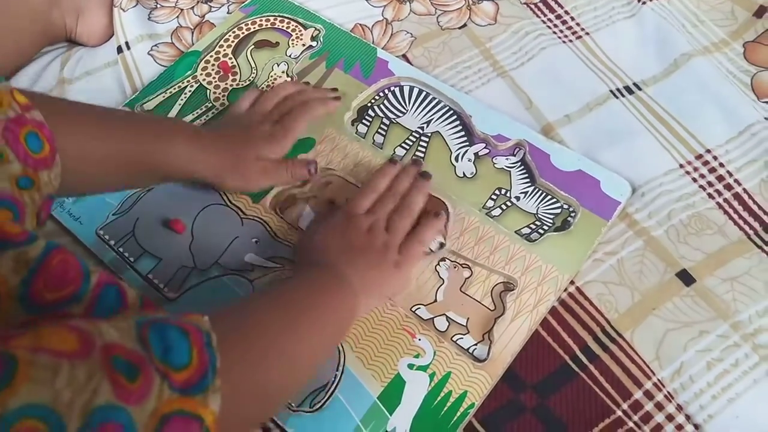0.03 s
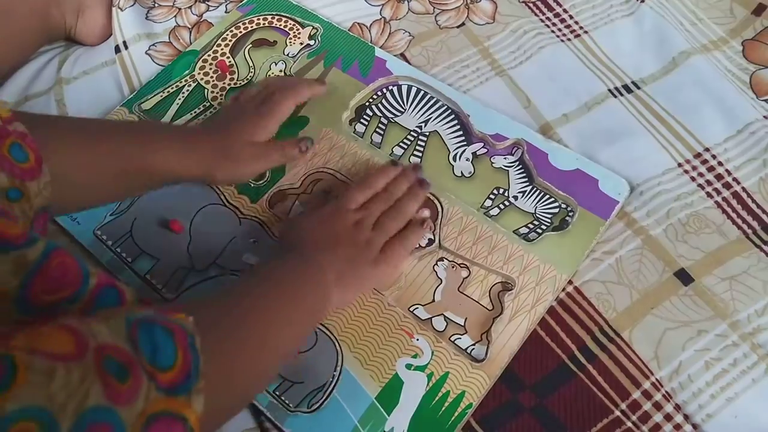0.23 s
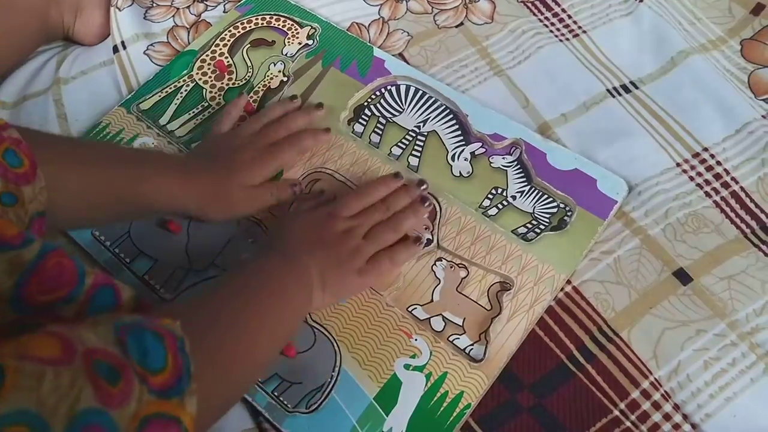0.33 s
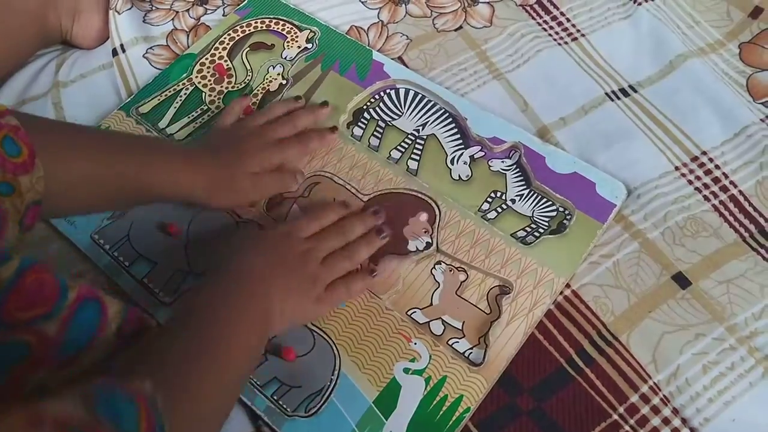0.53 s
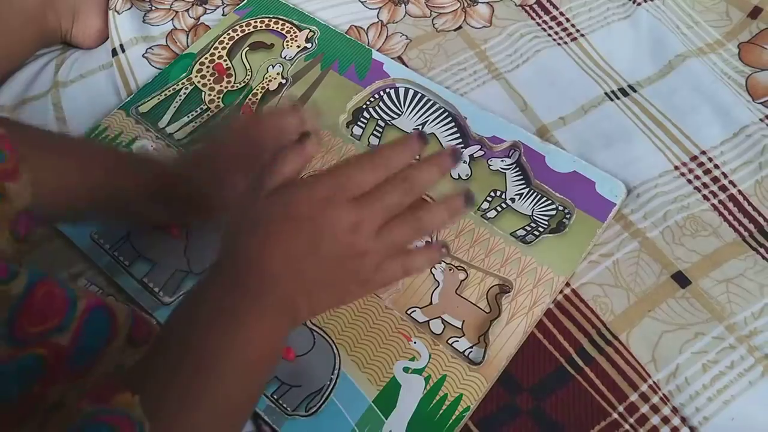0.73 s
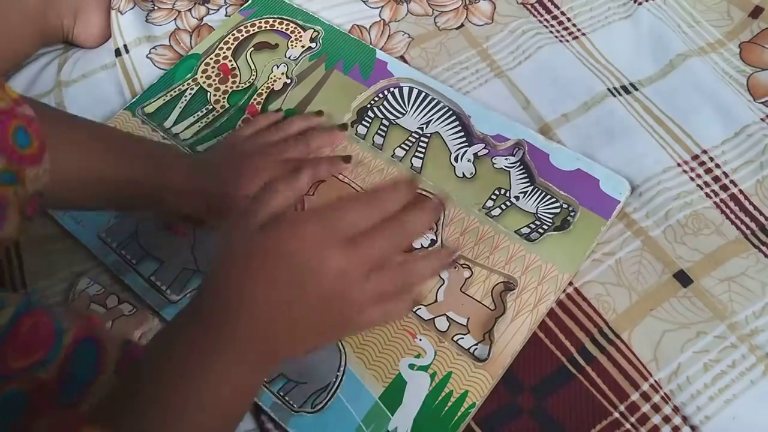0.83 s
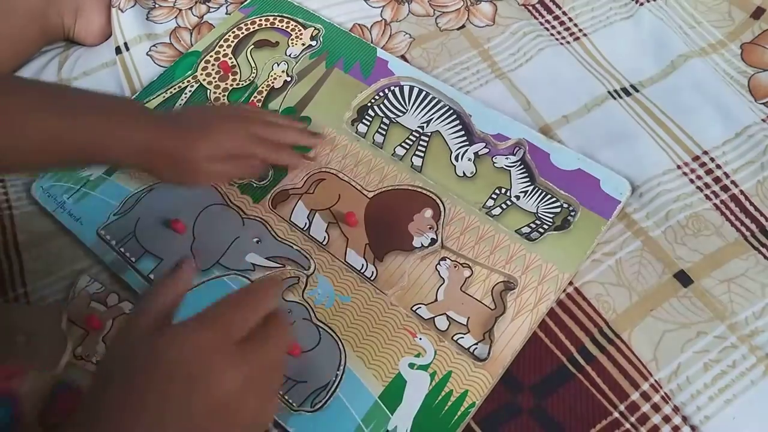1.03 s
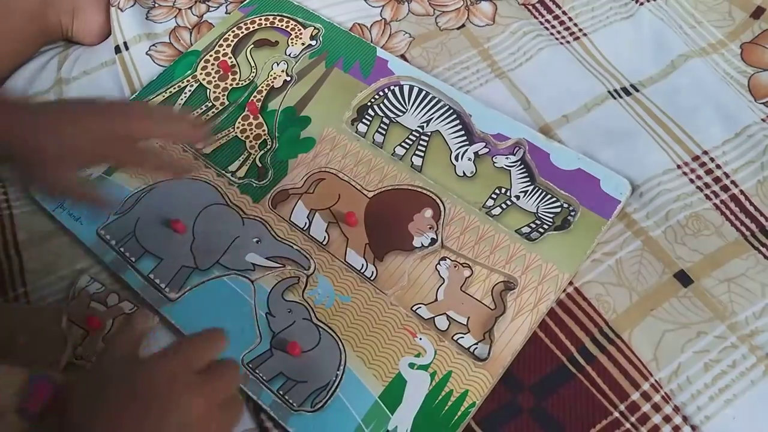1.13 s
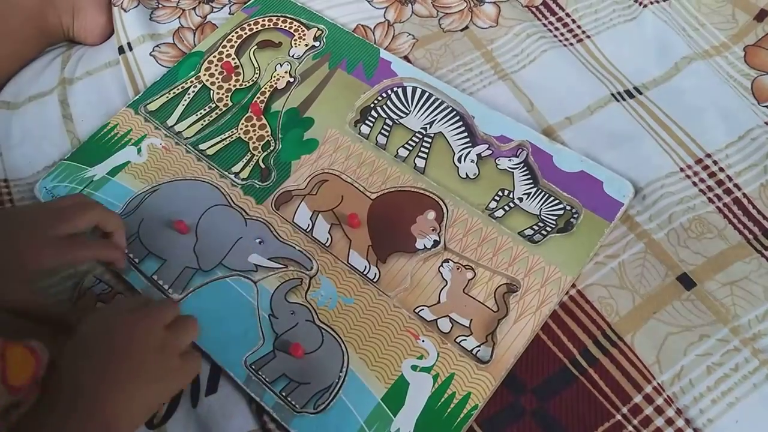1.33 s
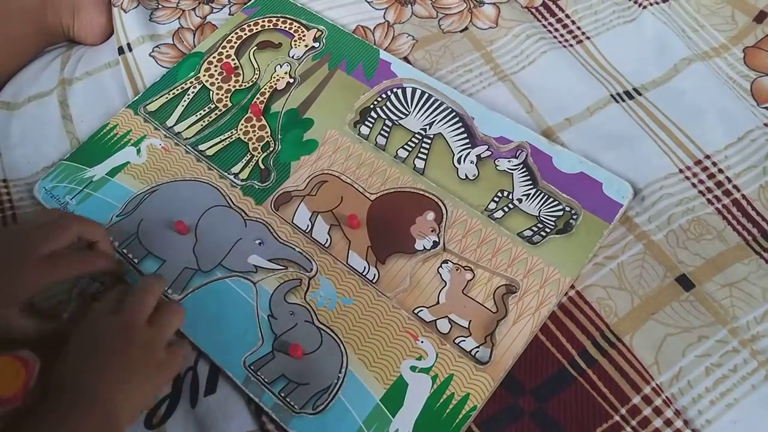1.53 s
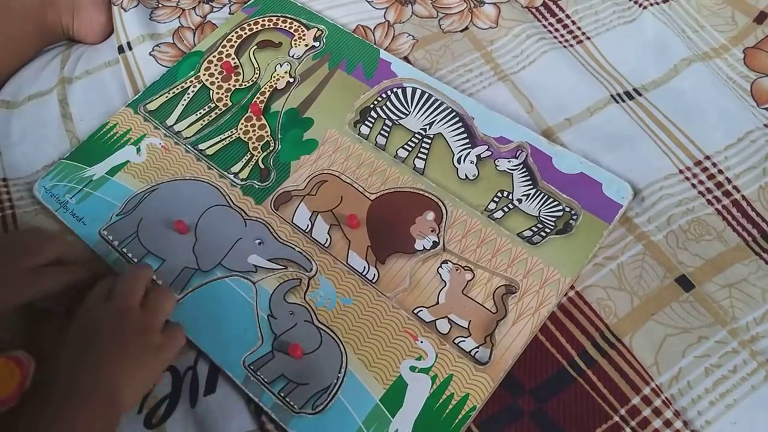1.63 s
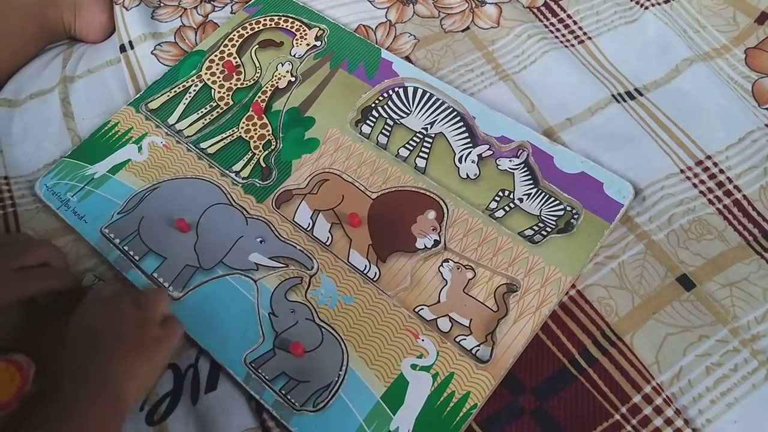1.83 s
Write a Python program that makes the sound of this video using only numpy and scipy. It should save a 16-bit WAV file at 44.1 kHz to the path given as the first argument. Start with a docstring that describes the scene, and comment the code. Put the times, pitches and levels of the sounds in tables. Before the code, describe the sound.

A wooden puzzle piece snaps into its board with a sharp clack at about 0.1 seconds. A faint fingertip squeak and a soft palm wipe follow around 0.4 to 0.6, then light taps near 0.8. At 1.3 the board is bumped with a duller knock, and a hollow scrape with small ticks runs until about 1.9. Everything is close, in a small room with low rumble and hum.

```python
"""A small, quiet room, with a wooden puzzle board lying on cloth close to a pair of microphones.
Pieces are pressed in: one snaps home, a fingertip squeaks over it and a palm wipes across. Then the
board is bumped and something slides along it with small taps and ticks. Each knock rings the board's
low, middle and high modes. The left microphone is slightly nearer and hears the board first.
Behind it all are a short room echo, low rumble, hum and faint hiss."""
import sys
import numpy as np
from scipy import signal
from scipy.fft import rfft, irfft
from scipy.io import wavfile
from scipy.ndimage import uniform_filter1d

SR = 44100
rng = np.random.default_rng(int(sys.argv[2]) if len(sys.argv) > 2 else 0)


def output_pcm(signal):
    """Save a mono or channel-first signal as 16-bit PCM at the path in sys.argv[1].

    Samples are clipped to [-1, 1] before scaling.
    """
    pcm = np.clip(np.atleast_2d(signal).T, -1, 1) * 32767
    wavfile.write(sys.argv[1], SR, np.round(pcm).astype(np.int16))


N = 83790
TIME = np.arange(N) / SR
# how much sooner each sound reaches the left microphone
BOARD_LEAD_S, CONTACT_LEAD_S, CATCH_LEAD_S, SLIDE_LEAD_S = .00009, .0001, .00028, .00048
BURST_T60_S = .013

# room rumble and hiss: frequency_hz, level_db
ROOM_TONE_SPECTRUM = [(20, -6.5), (40, 7.5), (70, 0.5), (108, 6.5), (160, -9), (260, -20.5), (500, -39.5),
                      (1200, -36.5), (3000, -37.5), (6000, -29.5), (8000, -37.5), (16000, -39)]
# skin and sleeves brushing: time_s, level_db
BRUSH_ENVELOPE = [(0, -62.5), (.09, -58.5), (.16, -68.5), (.29, -69), (.345, -61.5), (.41, -72.5),
                  (.55, -84), (.71, -87), (.81, -68.5), (.89, -74), (.98, -71.5), (1.06, -86.5),
                  (1.22, -82.5), (1.72, -70), (1.75, -61), (1.8, -73), (1.9, -84)]
# their rustle: frequency_hz, level_db
BRUSH_SPECTRUM = [(200, 13), (600, 6), (1400, -3.5), (3300, 4.5), (6300, 0), (7800, -22), (15000, -22.5)]
# knocks on the board: start_s, thud_db, wood_db, crack_db, crack_cutoff_hz, left_over_right_db
BOARD_KNOCKS = [(0.016, -53, -76, -58, 6740, 14), (0.0875, -63, -47, -45, 5050, -3),
                (0.1057, -85, -34, -29.5, 2460, 2.5), (0.1131, -35, -18.5, -9, 15100, -1.5),
                (0.1164, -42, -28.5, -24.5, 5000, 0.5), (0.7459, -47, -58, -50.5, 6000, -2.5),
                (0.7503, -46.5, -53.5, -54.5, 3000, 1.5), (0.7864, -52.5, -46, -37, 2450, -1.5),
                (0.960, -68, -69, -59, 4000, -1.5), (1.2874, -27.5, -36, -43, 2040, 1.5),
                (1.2903, -31, -34.5, -25, 14900, 6.5), (1.2988, -29.5, -29, -51, 2050, 0.5),
                (1.629, -47, -49, -38, 4000, 5), (1.74, -48, -48.5, -79.5, 5950, 12),
                (1.754, -40, -45, -66, 8600, 3), (1.859, -54, -61, -65, 4250, 5)]
# the board's low modes, its thud: pitch_hz, level_db, t60_s
LOW_MODES = [(55, -9.5, 0.37), (162.9, -7.5, 0.24), (235.6, -2.5, 0.088), (271, -10, 0.045),
             (390.8, -11, 0.053)]
# its middle modes, the woody note: pitch_hz, level_db, t60_s
MIDDLE_MODES = [(291, -8, 0.034), (468, -10, 0.039), (580, -1.5, 0.016), (753, -9, 0.023),
                (903, -17, 0.028), (990, -13, 0.027), (1350, -18.5, 0.005)]
# its high modes, the crack: pitch_hz, level_db, t60_s
HIGH_MODES = [(1490, -22, .015), (1722, -15.5, 0.01), (2090, -13.5, 0.0079), (2373, -17.5, 0.023),
              (2800, -24, 0.0092), (3525, -4.5, 0.01), (3575, -9, 0.015), (4010, -8.5, 0.0054),
              (5500, -2.5, 0.0064), (5640, -19, 0.0059), (6680, -12.5, .012), (7380, -16, 0.0051),
              (8500, -21, 0.004)]
# the splintery burst of a contact: frequency_hz, level_db
BURST_SPECTRUM = [(300, -10.5), (1200, -0.5), (3000, 7.5), (6500, 8.5), (8300, -4), (9500, -8), (12000, -8),
                  (16000, -17.5)]
# hands pressing the board into the cloth: start_s, level_db, t60_s
HAND_PRESSES = [(0.112, -45.5, 0.27), (0.743, -47, 0.78), (1.289, -54.5, 1), (1.734, -50.5, 1)]
# the rumble of a press: frequency_hz, level_db
PRESS_SPECTRUM = [(22, -7), (42, -4), (65, -2.5), (110, -13.5), (230, -20), (400, -37.5), (1000, -68)]
# board resonances under the fingertip: frequency_hz, level_db
SQUEAK_SPECTRUM = [(280, -9), (450, 5), (620, 0.5), (850, -6.5), (1200, -21.5), (2000, -36)]
# a palm wiping the pieces: time_s, level_db
WIPE_ENVELOPE = [(.40, -100), (.45, -75.5), (.56, -75.5), (.63, -83.5), (.68, -99)]
# its hiss: frequency_hz, level_db
WIPE_SPECTRUM = [(2000, -15.5), (4000, 6), (6500, 6.5), (9000, -1.5), (15000, -2.5)]
# sliding along the board: time_s, level_db
SLIDE_ENVELOPE = [(1.22, -100), (1.26, -76.5), (1.32, -47.5), (1.40, -56), (1.53, -59), (1.62, -56.5),
                  (1.74, -58), (1.81, -62), (1.9, -67)]
# its hollow scrape: frequency_hz, level_db
SLIDE_SPECTRUM = [(120, -1), (230, -7.5), (380, -11.5), (780, 1), (1300, -10.5), (2100, -13), (2530, 2),
                  (2900, -7), (3700, -12), (4300, -2.5), (4900, -6.5), (6300, -12), (7500, -20),
                  (9000, -24), (11500, -22.5), (15000, -26)]
# the slide catching: start_s, level_db
SLIDE_CATCHES = [(1.245, -56), (1.276, -45), (1.4215, -42), (1.604, -43), (1.653, -59.5), (1.7425, -42.5),
                 (1.7555, -43.5), (1.882, -57)]
# the ring of a catch: pitch_hz, level_db, t60_s
HOLLOW_MODES = [(600, -2.5, 0.0232), (739, 0.5, 0.0193), (1024, -11.5, 0.019), (2560, -9.5, 0.014),
                (4410, -24, 0.011), (5740, -10, 0.0059)]
# hard clicks at the edge of a piece: start_s, level_db, left_over_right_db
EDGE_TICKS = [(1.3268, -33, 9), (1.5763, -44.5, 15.5)]
# the ring of a tick: pitch_hz, level_db, t60_s
EDGE_MODES = [(2730, -20, 0.0071), (4120, 3.5, 0.011), (4504, -2, 0.025), (5830, -15, 0.0053),
              (6960, -1, 0.0063), (11900, -25, 0.0042), (13600, -22, .008)]
# the colour of the room's echo: frequency_hz, level_db
ECHO_SPECTRUM = [(60, -11.5), (250, -7.5), (600, -15.5), (1200, -8.5), (2500, -10.5), (6000, -13.5),
                 (8000, -15), (15000, -3)]
# the echo's decay: frequency_hz, t60_s
ECHO_DECAY = [(100, 0.41), (500, 0.48), (1500, 0.29), (5000, .3), (14000, 0.32)]


def from_db(db):
    return 10 ** (np.asarray(db) / 20)


def rms_one(x):
    return x / np.sqrt(np.mean(x ** 2) + 1e-20)


def at_hz(points, hz):
    frequencies, values = np.transpose(points)
    return np.interp(np.log(hz + 1e-3), np.log(frequencies), values)


def envelope(points):
    return from_db(np.interp(TIME, *np.transpose(points)))


def decay(t60_s):
    return from_db(-60 * np.minimum(TIME / t60_s, 10))


def butter(x, kind, hz, order=2):
    return signal.sosfilt(signal.butter(order, hz, kind, fs=SR, output="sos"), x)


def convolve(x, response):
    return signal.fftconvolve(np.broadcast_to(x, (2, N)), np.atleast_2d(response), axes=1)[:, :N]


def noise(spectrum):
    """Coloured noise, rms 1."""
    hz = np.arange(N // 2 + 1) * SR / N
    return rms_one(irfft(rfft(rng.standard_normal(N)) * from_db(at_hz(spectrum, hz)), N))


def at_mics(x, lead_s):
    """Sound reaches the right microphone a little after the left."""
    left, right = np.broadcast_to(x, (2, N))
    hz = np.arange(N // 2 + 1) * SR / N
    return np.array([left, irfft(rfft(right) * np.exp(-2j * np.pi * hz * lead_s), N)])


def stereo_noise(spectrum, lead_s, diffuse_db):
    """Noise at two microphones: a shared part and a diffuse part."""
    shared = at_mics(noise(spectrum), lead_s)
    diffuse = np.array([noise(spectrum), noise(spectrum)])
    return rms_one(shared + from_db(diffuse_db) * diffuse)


def grip(depth_db=2, samples=160):
    """Uneven grip: a gain that flickers at random."""
    flicker = rng.standard_normal(N)
    for _ in range(2):
        flicker = uniform_filter1d(flicker, samples, mode="wrap")
    return rms_one(from_db(depth_db * rms_one(flicker)))


def impulses(start_s, level_db, pan_db):
    """One stereo impulse for each contact; positive pan is to the left."""
    out = np.zeros((2, N))
    out[:, (start_s * SR).astype(int)] = from_db([level_db + pan_db / 2, level_db - pan_db / 2])
    return out


def ring(modes, alternate=False):
    """Decaying sines: in step they leave notches between them, with alternating signs they blend."""
    return sum(from_db(db) * decay(t60_s) * np.sin(2 * np.pi * hz * TIME) * (-1) ** (k * alternate)
               for k, (hz, db, t60_s) in enumerate(modes))


def room_tone(floor_db=-65.5, hum_hz=104.3, hum_db=-68, waver_db=2, waver_hz=7):
    """Low rumble and a wavering hum in the centre, faint hiss spread wide."""
    mid = noise(ROOM_TONE_SPECTRUM)
    side = butter(noise(ROOM_TONE_SPECTRUM), "high", hz=600, order=1)
    waver = rms_one(butter(rng.standard_normal(2 * N), "low", waver_hz)[N:])
    hum = from_db(hum_db + waver_db * waver) * np.sin(2 * np.pi * hum_hz * TIME)
    return from_db(floor_db) * (mid + side * [[1], [-1]]) + hum


def brushing():
    """Light, grainy friction of skin and sleeves."""
    return envelope(BRUSH_ENVELOPE) * grip() * stereo_noise(BRUSH_SPECTRUM, CONTACT_LEAD_S, diffuse_db=4)


def knocks(burst_db=-7):
    """Each contact rings three groups of modes with a brief burst; soft contacts lose the top."""
    start_s, thud_db, wood_db, crack_db, cutoff_hz, pan_db = np.transpose(BOARD_KNOCKS)
    # the board radiates little bass
    thud_ring = butter(ring(LOW_MODES), "high", hz=130)
    wood_ring = butter(ring(MIDDLE_MODES), "high", hz=230)
    thud = convolve(impulses(start_s, thud_db, pan_db=-2.5), thud_ring)
    wood = convolve(impulses(start_s, wood_db, pan_db), wood_ring)
    burst = from_db(burst_db) * decay(BURST_T60_S) * stereo_noise(BURST_SPECTRUM, 0, diffuse_db=4.5)
    hits = 0
    for k in range(len(start_s)):
        hit = impulses(start_s[[k]], crack_db[[k]], pan_db[[k]])
        hits = hits + butter(hit + 1e-18, "low", cutoff_hz[k])
    crack = convolve(hits, ring(HIGH_MODES, alternate=True) + burst)
    return at_mics(thud + wood, BOARD_LEAD_S) + at_mics(crack, CONTACT_LEAD_S)


def presses(rise_s=.006):
    """A soft rumble as the board settles into the cloth."""
    swell = 0
    for start_s, level_db, t60_s in HAND_PRESSES:
        age_s = TIME - start_s
        onset = np.clip(age_s / rise_s, 0, 1)
        swell = swell + from_db(level_db) * onset * np.interp(age_s, TIME, decay(t60_s))
    return swell * stereo_noise(PRESS_SPECTRUM, CONTACT_LEAD_S, diffuse_db=-14)


def finger_squeak(start_s=.340, length_s=.062, from_hz=275, to_hz=520, level_db=-61.5):
    """A fingertip sticks and slips ever faster; its harmonics glide up through the board's resonances."""
    progress = np.clip((TIME - start_s) / length_s, 0, 1)
    pitch_hz = from_hz + (to_hz - from_hz) * progress ** 2
    phase = 2 * np.pi * np.cumsum(pitch_hz) / SR
    tone = sum(from_db(at_hz(SQUEAK_SPECTRUM, k * pitch_hz)) * np.sin(k * phase) for k in range(1, 6))
    return at_mics(from_db(level_db) * np.sin(np.pi * progress) * tone, CONTACT_LEAD_S)


def palm_wipe():
    """A palm hisses softly across the smooth pieces."""
    return envelope(WIPE_ENVELOPE) * stereo_noise(WIPE_SPECTRUM, CONTACT_LEAD_S, diffuse_db=5)


def slide():
    """Grainy, hollow friction that sets the board's low modes juddering."""
    scrape = grip() * stereo_noise(SLIDE_SPECTRUM, SLIDE_LEAD_S, diffuse_db=-1)
    judder = grip(depth_db=4, samples=1500) * rms_one(convolve(rng.standard_normal(N), ring(LOW_MODES)))
    return envelope(SLIDE_ENVELOPE) * (scrape + judder)


def catches(scuff_db=-3):
    """The slide catches for an instant: dull, hollow taps, each with a little scuff."""
    taps = impulses(*np.transpose(SLIDE_CATCHES), pan_db=0)
    scuff = from_db(scuff_db) * decay(BURST_T60_S) * noise(SLIDE_SPECTRUM)
    return at_mics(convolve(taps, ring(HOLLOW_MODES) + scuff), CATCH_LEAD_S)


def ticks(burst_db=-7):
    """The edge of a piece clicks, thin and high, off to the left."""
    clicks = impulses(*np.transpose(EDGE_TICKS))
    burst = from_db(burst_db) * decay(BURST_T60_S) * noise(BURST_SPECTRUM)
    return at_mics(convolve(clicks, ring(EDGE_MODES, alternate=True) + burst), SLIDE_LEAD_S)


def room_echo(x, delay_s=.0058, rise_s=.002):
    """A diffuse tail that dies band by band, its bass alike at both microphones."""
    tail = 0
    edges_hz = np.geomspace(50, 17000, 15)
    onset = np.clip((TIME - delay_s) / rise_s, 0, 1)
    for low, high in zip(edges_hz, edges_hz[1:]):
        hz = np.sqrt(low * high)
        coherence = 1 / (1 + (hz / 700) ** 2)
        shared = np.sqrt(coherence) * rng.standard_normal(N)
        diffuse = np.sqrt(1 - coherence) * rng.standard_normal((2, N))
        band = butter(shared + diffuse, "band", [low, high]) * onset * decay(at_hz(ECHO_DECAY, hz))
        unity_band = rms_one(band) * np.sqrt(2 * (high - low) / SR / N)
        tail = tail + from_db(at_hz(ECHO_SPECTRUM, hz)) * unity_band
    return convolve(x, tail)


def scene():
    """Contacts and squeak echo in the room; pressing and rubbing stay dry, over the room tone."""
    puzzle = knocks() + ticks() + catches() + finger_squeak()
    return puzzle + room_echo(puzzle) + presses() + slide() + brushing() + palm_wipe() + room_tone()


def record(dry, low_cut_hz=32, stopband_hz=16650):
    """The microphone pair goes through a rumble filter and a steep top cut."""
    dry = butter(dry, "high", low_cut_hz, order=3)
    return signal.sosfilt(signal.cheby2(18, 60, stopband_hz, fs=SR, output="sos"), dry)


dry = scene()
out = record(dry)
output_pcm(out)
```